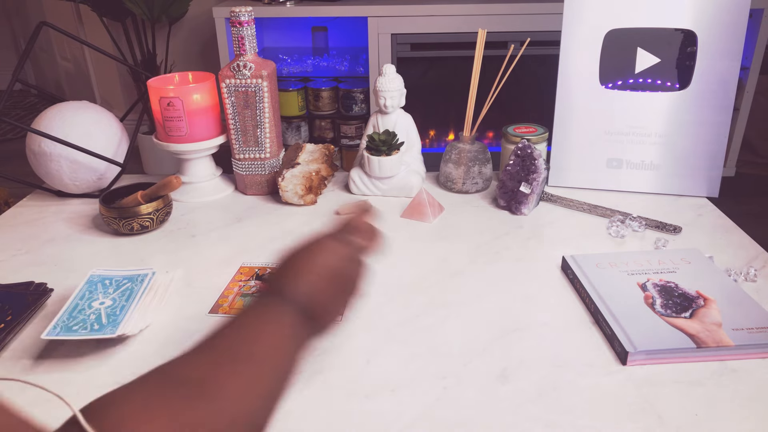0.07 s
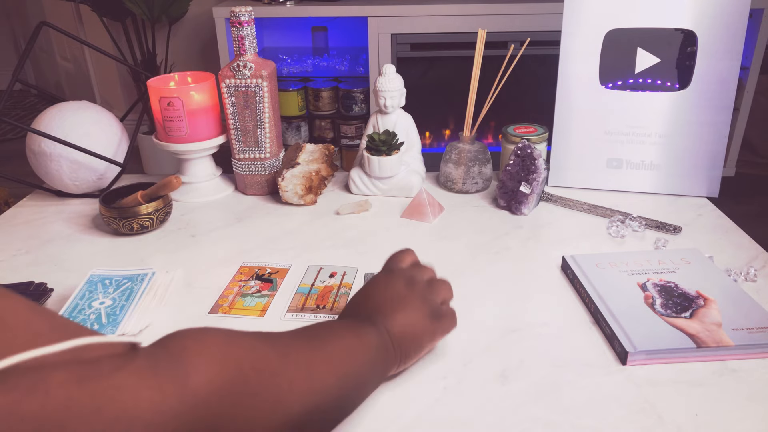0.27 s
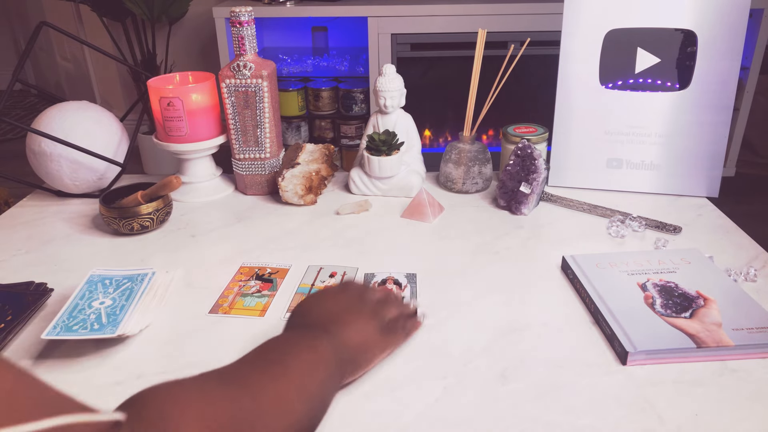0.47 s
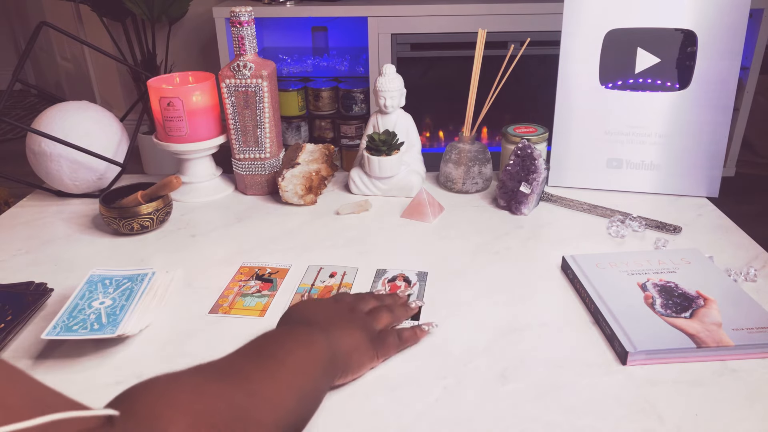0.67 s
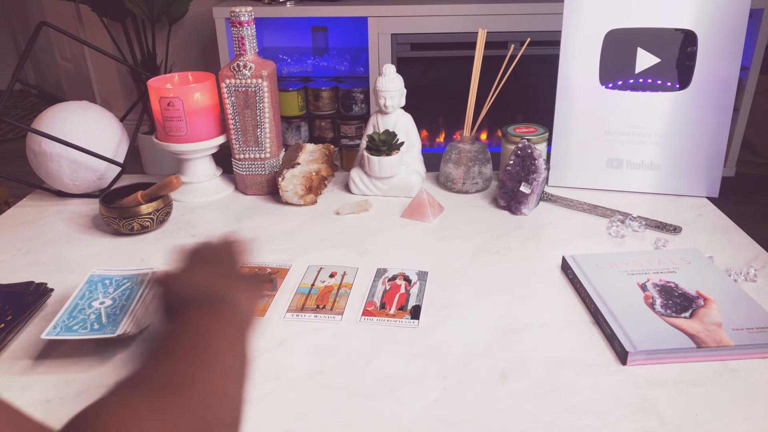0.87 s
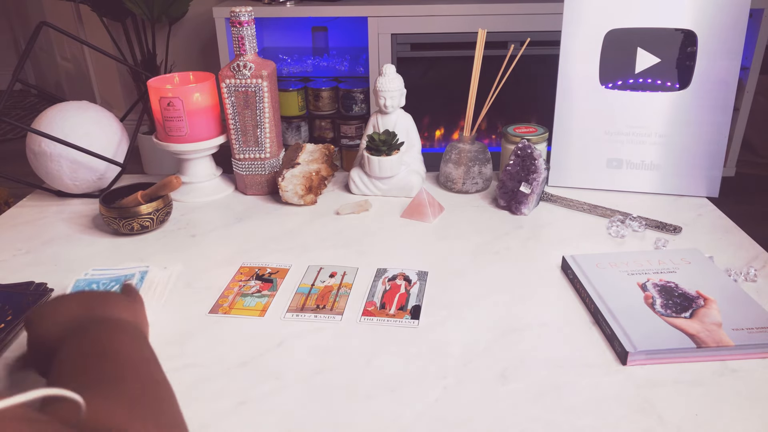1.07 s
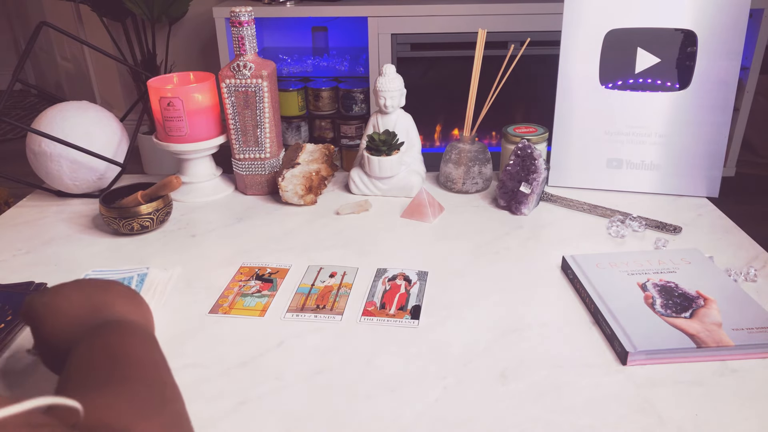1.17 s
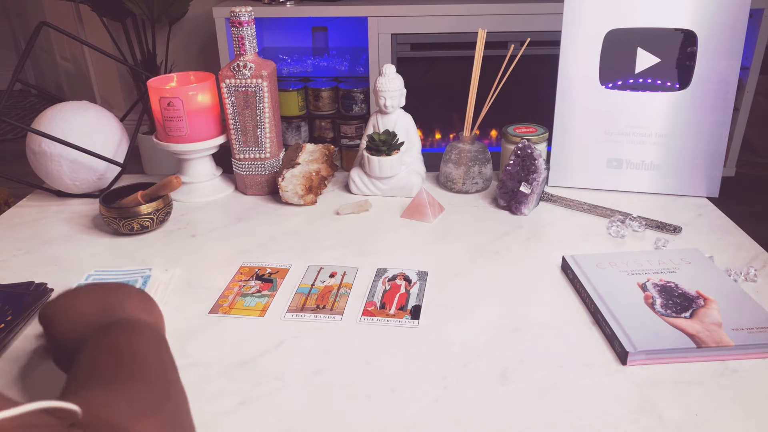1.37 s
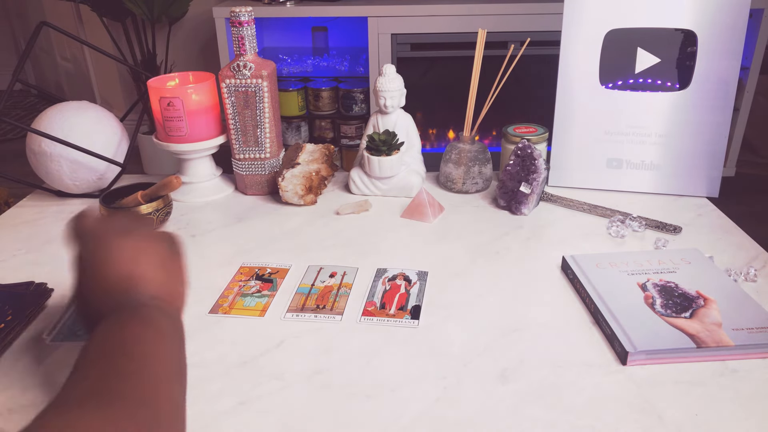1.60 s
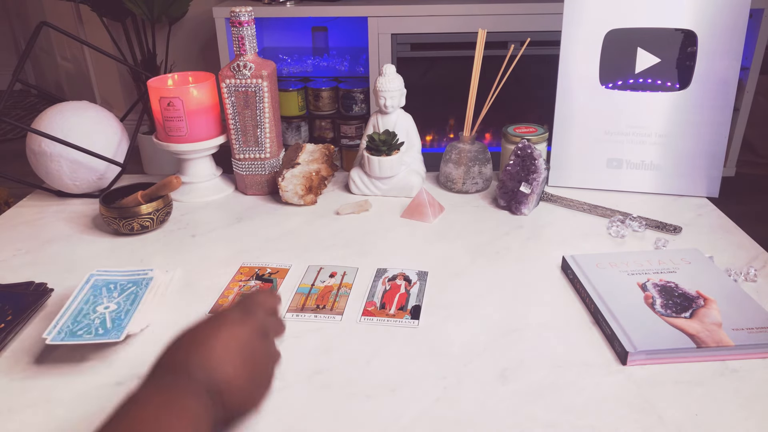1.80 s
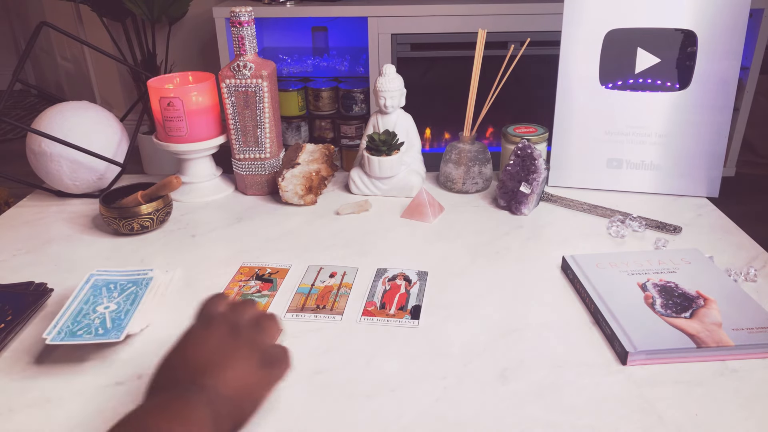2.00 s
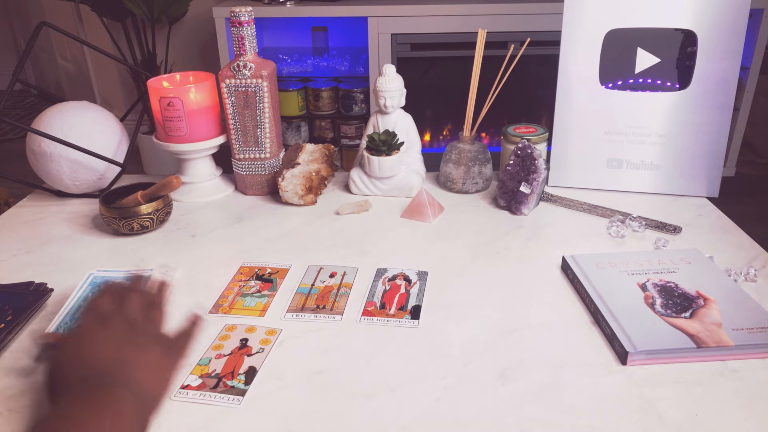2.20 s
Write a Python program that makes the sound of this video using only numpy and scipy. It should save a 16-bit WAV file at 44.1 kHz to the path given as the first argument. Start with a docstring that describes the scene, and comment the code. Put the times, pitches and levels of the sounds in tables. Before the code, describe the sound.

Two cards snap onto a hard tabletop, with soft slides and small ticks between.

```python
"""Two tarot cards are dealt onto a hard tabletop, close up, in a small room with a faint hum.
Card slides softly over card while edges and fingernails tick on the table. At 0.23 s the first
bent card scrapes off the fingertip and slaps flat with a sharp snap that the room answers.
More slides and ticks lead to a second, lighter snap at 1.87 s, and two last slides trail off."""
import sys
import numpy as np
from scipy import signal
from scipy.fft import rfft, irfft, next_fast_len
from scipy.io import wavfile
from scipy.ndimage import uniform_filter1d, map_coordinates

SR = 44100
rng = np.random.default_rng(int(sys.argv[2]) if len(sys.argv) > 2 else 0)


def unload_wav(signal):
    """Save mono or channel-first audio to the path in sys.argv[1] as 16-bit WAV at rate SR, clipped to [-1, 1]."""
    wavfile.write(
        sys.argv[1],
        SR,
        np.round(np.clip(np.atleast_2d(signal).T, -1, 1) * 32767).astype(np.int16),
    )


N = 99225

# Tone colours. Each row: frequency in Hz, relative level in dB.
AIR_EQ = [(15, -6), (25, 0), (44, -5), (70, -7.5), (134, -12), (367, -19.5), (825, -23), (1100, -23),
          (2000, -28.5), (3000, -27.5), (6000, -30.5), (12400, -30), (16000, -37)]  # the room's still air
FRICTION_EQ = [(200, -17), (1000, -12), (2000, -11.5), (2900, -3), (4200, -13.5), (7000, -7), (10500, -2.5),
               (13500, -4.5), (16000, -10)]  # card rubbing on card
CATCH_EQ = [(100, -50), (5000, -22.5), (9000, -13.5), (12600, 0), (16000, -14.5)]  # tiny catches of the card surface
KNOCK_EQ = [(60, -22), (200, -6), (330, -3.5), (430, -7), (560, 2), (800, -2.5), (1100, -3.5), (1600, -12),
            (2400, -15.5), (5000, -25.5), (16000, -50)]  # a touch on the tabletop
CLICK_EQ = [(100, -33), (1500, -17.5), (2600, 2), (4500, -2), (6700, 2), (8500, 2.5), (10500, 1),
            (13000, -1), (16000, -15)]  # a card edge or nail
CLICK_REVERB_EQ = [(200, -17), (1500, -2.5), (2500, 1.5), (3300, 2.5), (4200, -2.5), (7000, -1),
                   (10000, -4.5), (13000, -5), (16000, -19)]  # the room's answer to a click
SCRAPE_EQ = [(100, -26), (600, 4.5), (1800, -21.5), (3300, -8), (4800, -7.5), (6800, 0), (9500, -3),
             (13000, -5.5), (16000, -10)]  # the edge leaving the fingertip
REBOUND_EQ = [(100, -30.5), (700, -4.5), (1800, -10), (3300, -3.5), (6500, -5.5), (10000, -2.5), (12800, 6),
              (16000, -11.5)]  # the card bouncing
# One tone colour per card. Each row: frequency in Hz, relative level in dB.
SLAP_EQS = [
    [(60, -42), (130, -31.5), (250, -7.5), (400, -18), (680, -16), (1200, -10.5), (1800, -24), (2600, -19),
     (4700, -10), (6100, -4), (7300, -6.5), (8200, 4.5), (10000, -3.5), (13300, 0.5), (16000, -10.5)],
    [(60, -53.5), (130, -15), (300, -4), (620, -6), (1150, -2), (1800, -18.5), (2400, -4.5), (3600, 1.5),
     (4700, -10), (6000, 4), (7800, -10), (9200, -4), (10500, 3.5), (13000, 2), (16000, -13)],
]  # the card landing flat
SNAP_REVERB_EQS = [
    [(60, -33.5), (150, -12.5), (275, -1), (430, -13), (680, -1.5), (1130, 1), (1750, -4.5), (2400, -7.5),
     (3700, -3), (4600, -3), (6000, 0), (8000, 0.5), (10500, 0), (12800, -2.5), (16000, -16)],
    [(60, -34.5), (150, -3.5), (260, -0.5), (430, -0.5), (680, -3), (1300, -1.5), (1750, -3.5), (2280, 2),
     (3100, -8.5), (3850, 3), (4500, -5), (5600, 2.5), (8000, 2), (10500, 1.5), (12800, 0), (16000, -11.5)],
]  # what the snap sends into the room

# Strokes of card over card. Each row: midpoint in seconds, swell width in seconds, level in dB,
# hiss peak in Hz, boost at that peak in dB.
SLIDE_CUES = [(0.03, .14, -62.5, 12700, 5), (0.585, 0.064, -61.5, 12360, 7.5), (0.774, .03, -62, 2900, 5.5),
              (.9, 0.096, -67.5, 12000, 0.5), (1.09, 0.093, -68.5, 12340, 10), (1.24, 0.2, -67.5, 2935, 11),
              (1.375, .035, -60, 12500, 13), (1.462, 0.049, -67.5, 5100, 22),
              (1.522, 0.045, -60.5, 9050, 4), (1.64, 0.039, -70, 12500, 6), (1.818, 0.04, -50, 12800, 10),
              (2.002, 0.043, -48.5, 12400, 11), (2.23, 0.066, -60, 12500, 5.5)]
# Touches of edges and nails. Each row: start in seconds, knock level in dB, knock hold in seconds,
# card ring in dB, click level in dB, click peak in Hz, click tilt in dB per octave, click T60 in seconds.
TICK_CUES = [(.0065, -28.5, 0.005, -52, -38, 2500, -10, 0.014),
             (.0237, -56, .001, -64, -34, 9600, 0.5, .003), (0.062, -58, .001, -60, -37, 12500, 3, .005),
             (0.079, -51, .001, -60, -31, 12500, 15, .004),
             (0.0892, -22, 0.0012, -38, -22.5, 6200, 0, 0.0094), (.095, -32, .003, -47, -37, 6300, -6, .02),
             (0.1236, -29, 0.00092, -14.5, -10, 6530, -2.8, 0.012),
             (0.1539, -31, .001, -15.5, -16, 6950, 0.5, 0.0098), (.410, -38, .001, -32, -33, 3300, 0, .014),
             (0.437, -32.5, 0.00076, -31, -21, 4900, -2, 0.0044),
             (.944, -58, .001, -65.5, -40.5, 13000, 7, 0.017),
             (1.021, -44, .002, -48, -40.5, 7000, 7, .012), (1.041, -43, .002, -60, -39, 7000, -0.5, .01),
             (1.058, -39.5, .002, -45, -38.5, 4700, -3, .012),
             (1.286, -47.5, 0.00076, -45, -42, 2900, -4, 0.016),
             (1.361, -55, 0.00081, -60, -41.5, 12300, 5, .006),
             (1.478, -45, .002, -62, -34, 5100, 1, 0.032), (1.484, -33, 0.00063, -52, -25, 5200, -1, .011),
             (1.559, -31, 0.0078, -52, -39, 3340, -1, .05),
             (1.683, -38.5, 0.0014, -58, -42.5, 6300, 0.5, 0.0081),
             (1.7343, -20, .0015, -24, -22.5, 2920, -6, .014),
             (1.7422, -28.5, .002, -46, -28, 12100, -2.5, 0.02),
             (1.8004, -30, .002, -33, -18.5, 9200, 0, 0.015),
             (1.806, -29.5, 0.0052, -37, -29, 2920, -1, .02),
             (1.841, -33, .002, -54, -31, 3700, -9, 0.0089),
             (1.8545, -33, .001, -58, -28.5, 12000, 7, 0.015)]
# When each card lands, in seconds.
LANDING_TIMES = [.2287, 1.8667]
# The two snaps. Each row: slap level in dB, slap hold in seconds, scrape lead in seconds, scrape in dB,
# card ring in dB, table ring in dB, rebound delay in seconds, rebound in dB, reverb in dB.
SNAP_CUES = [(13, 0.0017, 0.0017, -3, 4.5, -10.5, 0.0025, -0.5, 0.5),
             (5, 0.00074, .0028, -3, -11, -14, .0021, -5, -5)]

# Resonances of card and tabletop. Each row: frequency in Hz, relative level in dB, T60 in seconds.
CARD_RING = [(3346, -5.5, .013), (2649, -20.5, 0.017), (4484, -14, 0.0054)]
TABLE_RING = [(283, -4.5, 0.034), (568, -3.5, 0.019), (670, 2.5, 0.028), (1110, -2, .025),
              (1260, -5, 0.021)]
# The room's decay. Each row: frequency in Hz, T60 in seconds.
REVERB_T60 = [(100, 0.25), (300, .38), (1200, 0.51), (3500, 0.55), (7000, 0.5), (11000, 0.46),
              (16000, 0.68)]
# Early reflections off the walls. Each row: delay in seconds, level against the slap in dB.
WALL_ECHOES = [(.0105, -25.5), (.0155, -23), (.0225, -21), (.0315, -26)]

HIT_SIZE = 4096  # samples in one impact


def amp(db):
    """Decibels to gain."""
    return 10 ** (np.asarray(db) / 20)


def unit(x):
    """Scale to rms 1."""
    return x / np.sqrt(np.mean(x ** 2) + 1e-20)


def at_energy(x, db):
    """Scale to a total energy in dB."""
    return amp(db) * x / (np.linalg.norm(x) + 1e-12)


def along(points, hz):
    """Read a curve of (Hz, value) points on a log frequency axis."""
    freqs, values = np.transpose(points)
    return np.interp(np.log(hz + 1), np.log(freqs + 1), values)


def bell(hz, centre, width_oct):
    """A bell curve around a centre frequency."""
    return np.exp(-(np.log2((hz + 1) / centre) / width_oct) ** 2)


def add(track, start, x):
    """Mix x into the track at a start time in seconds."""
    i = max(0, round(start * SR))
    track[i:i + len(x)] += x[:len(track) - i]


def filtered(x, response):
    """Filter x with a gain given as a function of frequency."""
    size = next_fast_len(len(x) + HIT_SIZE)
    return irfft(rfft(x, size) * response(np.fft.rfftfreq(size, 1 / SR)), size)[:len(x)]


def noise(eq, size=N):
    """Coloured noise of rms 1."""
    return unit(filtered(rng.standard_normal(size), lambda hz: amp(along(eq, hz))))


def wobble(rate):
    """A smooth random curve with `rate` knots a second."""
    return map_coordinates(rng.standard_normal(N), [np.arange(N) * rate / SR], mode="wrap")


def room_tone(air_db=-64.5, hum_hz=114.3, hum_db=-72):
    """The bed: still air and a low appliance hum that wavers in pitch and level."""
    phase = 2 * np.pi * hum_hz * np.arange(N) / SR + .6 * wobble(5.1)
    hum = np.sin(phase) * amp(1.8 * wobble(7.3))
    return amp(air_db) * noise(AIR_EQ) + amp(hum_db) * unit(hum)


def slides(catches_per_s=100, catch_db=-10, grain_db=2):
    """Card rubs over card: a grainy hiss with tiny catches, swelling and fading with each stroke."""
    t, out = np.arange(N) / SR, np.zeros(N)
    catches = (rng.random(N) < catches_per_s / SR) * rng.standard_normal(N)
    friction = unit(noise(FRICTION_EQ) * amp(grain_db * (wobble(760) + 0.61 * wobble(60))))
    friction += amp(catch_db) * unit(filtered(catches, lambda hz: amp(along(CATCH_EQ, hz))))
    for middle, width, db, peak_hz, boost_db in SLIDE_CUES:
        width_oct = 1.5e-5 * peak_hz  # higher hiss peaks are broader
        hiss = unit(filtered(friction, lambda hz: amp(boost_db * bell(hz, peak_hz, width_oct))))
        swell = np.exp(-2 * ((t - middle) / width) ** 2)
        out += amp(db) * swell * hiss
    return out


def contact(eq, hold, t60, edge=0, peak_hz=None, boost_db=6.5):
    """A first impact of strength `edge` and a spray of micro-impacts that holds, then dies away."""
    t, hz = np.arange(HIT_SIZE) / SR, np.fft.rfftfreq(HIT_SIZE, 1 / SR)
    envelope = amp(-60 * np.maximum(t - hold, 0) / t60)
    spray = at_energy(rng.standard_normal(HIT_SIZE) * envelope, 0)
    spectrum = rfft(spray + edge * (t == 0))
    spray_colour = np.sqrt(np.abs(uniform_filter1d(np.abs(spectrum) ** 2, size=30)) + 1e-9)
    colour_db = along(eq, hz) + (boost_db * bell(hz, peak_hz, width_oct=0.22) if peak_hz else 0)
    # A minimum-phase EQ keeps the attack crisp: nothing sounds ahead of the hit.
    cepstrum = irfft(np.log(amp(colour_db) / spray_colour))
    cepstrum[1:HIT_SIZE // 2] *= 2
    cepstrum[HIT_SIZE // 2 + 1:] = 0
    return irfft(spectrum * np.exp(rfft(cepstrum)))


def ring(modes, db, attack_s=0.0012):
    """A struck card or tabletop rings in damped modes."""
    t = np.arange(HIT_SIZE) / SR
    tones = sum(amp(mode_db - 60 * t / t60) * np.sin(2 * np.pi * hz * t) for hz, mode_db, t60 in modes)
    return at_energy((1 - np.exp(-t / attack_s)) * tones, db)


def reverb(eq, db, length_s, predelay_s=.004, build_s=.004):
    """The room answers: noise builds after a short delay and each band dies at its own rate."""
    hz, t, bands = signal.stft(noise(eq, int(length_s * SR)), SR, nperseg=256)
    decay = amp(-60 * t / along(REVERB_T60, hz)[:, None])
    tail = signal.istft(bands * decay, SR, nperseg=256)[1]
    age = np.maximum(np.arange(len(tail)) / SR - predelay_s, 0)
    return at_energy(tail * (1 - np.exp(-age / build_s)), db)


def ticks(tilt_pivot_hz=5000):
    """Each light touch of an edge or nail knocks the table, rings the card, clicks and wakes the room."""
    out = np.zeros(N)
    click_tail = reverb(CLICK_REVERB_EQ, db=-7.5, length_s=.5)
    knock_tail = reverb(KNOCK_EQ, db=-8, length_s=.5)
    for start, knock_db, hold, card_db, click_db, peak_hz, tilt, t60 in TICK_CUES:
        click_eq = [(hz, db + tilt * np.log2(hz / tilt_pivot_hz)) for hz, db in CLICK_EQ]
        knock = at_energy(contact(KNOCK_EQ, hold, t60=.018), knock_db)
        click = at_energy(contact(click_eq, hold=0, t60=t60, edge=0.21, peak_hz=peak_hz), click_db)
        add(out, start, knock + ring(CARD_RING, card_db) + click)
        add(out, start, amp(click_db) * click_tail + amp(knock_db) * knock_tail)
    return out


def snaps():
    """A bent card scrapes off the finger, slaps down, rings and rebounds; table and room answer."""
    out = np.zeros(N)
    for landing, cue, slap_eq, reverb_eq in zip(LANDING_TIMES, SNAP_CUES, SLAP_EQS, SNAP_REVERB_EQS):
        slap_db, hold, lead, scrape_db, card_db, table_db, rebound_delay, rebound_db, reverb_db = cue
        scrape = at_energy(contact(SCRAPE_EQ, hold=lead, t60=0.0045), scrape_db)
        slap = at_energy(contact(slap_eq, hold, t60=0.0037, edge=.5), slap_db)
        rebound = at_energy(contact(REBOUND_EQ, hold=.0006, t60=0.014), rebound_db)
        add(out, landing - lead, scrape)
        add(out, landing, slap + ring(CARD_RING, card_db) + ring(TABLE_RING, table_db))
        add(out, landing + rebound_delay, rebound)
        for wall_delay, wall_db in WALL_ECHOES:
            add(out, landing + wall_delay, amp(wall_db) * slap)
        add(out, landing, reverb(reverb_eq, reverb_db, length_s=.75))
    return out


def scene():
    """The mono mix: snaps up front, ticks and slides around them, room tone underneath."""
    return (snaps() + ticks() + slides() + room_tone())[None]


def record(dry, cutoff_hz=16050):
    """Clip at full scale, then cut the very top with a steep low-pass."""
    clipped = np.clip(dry[0], -1, 1)
    return filtered(clipped, lambda hz: 1 / np.sqrt(1 + (hz / cutoff_hz) ** 160))[None]


dry = scene()
out = record(dry)
unload_wav(out)
```